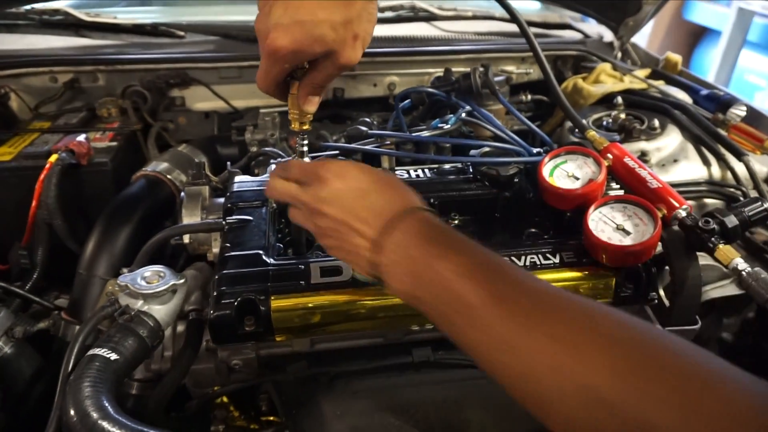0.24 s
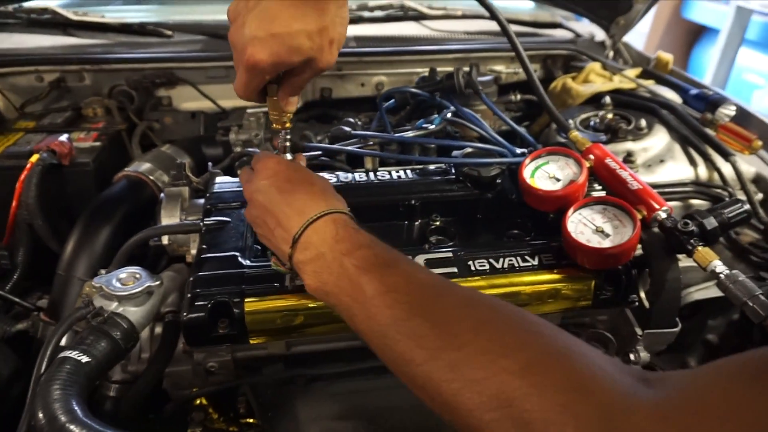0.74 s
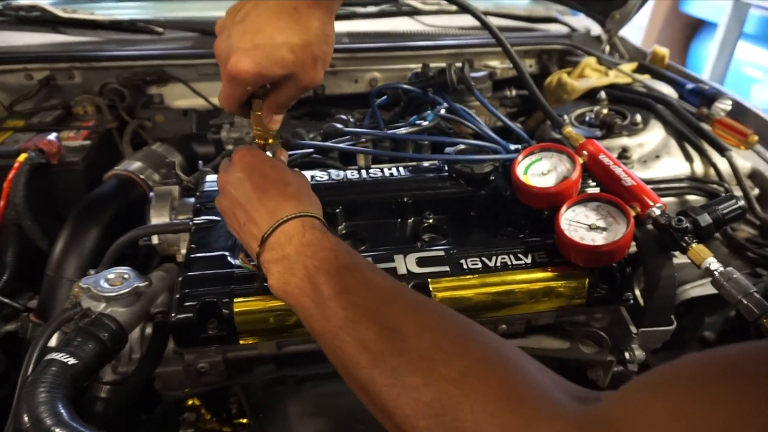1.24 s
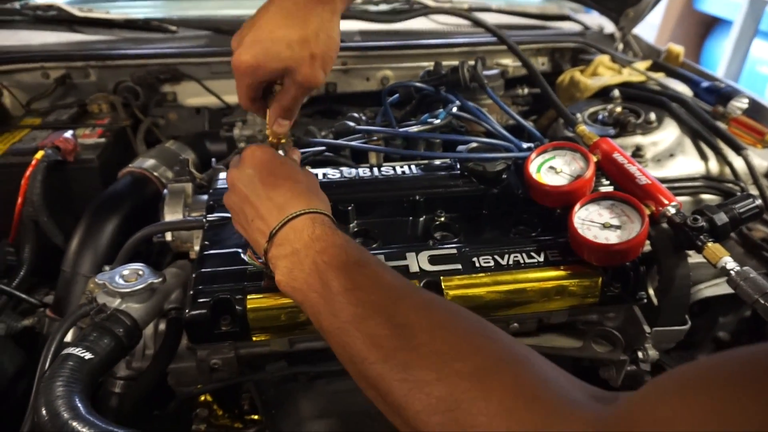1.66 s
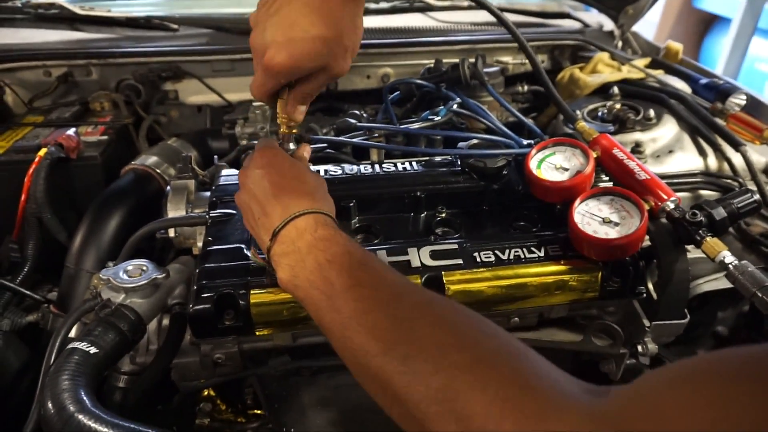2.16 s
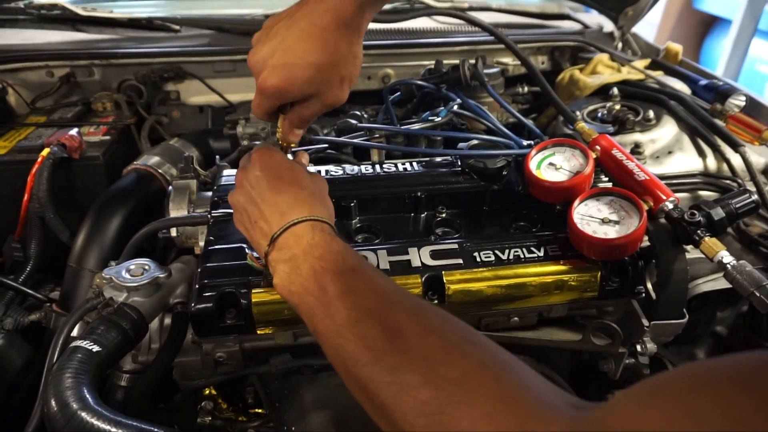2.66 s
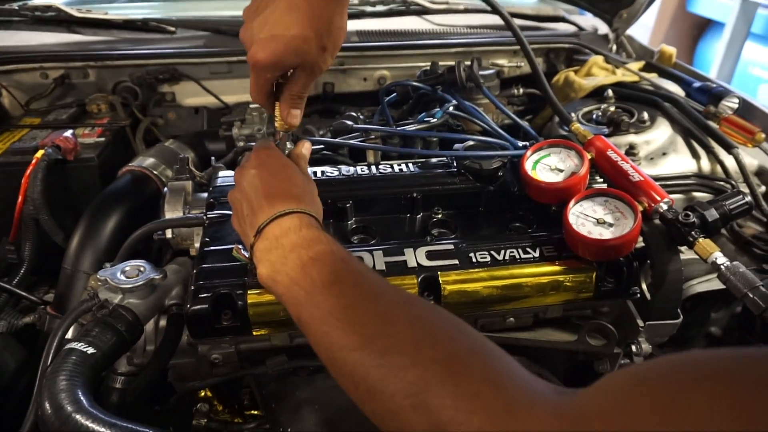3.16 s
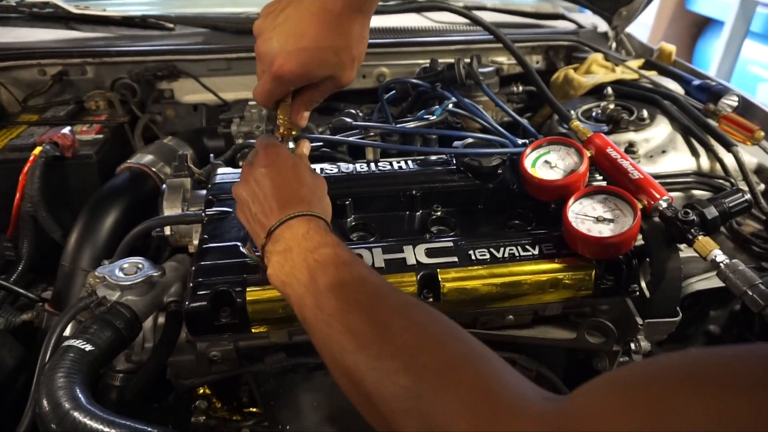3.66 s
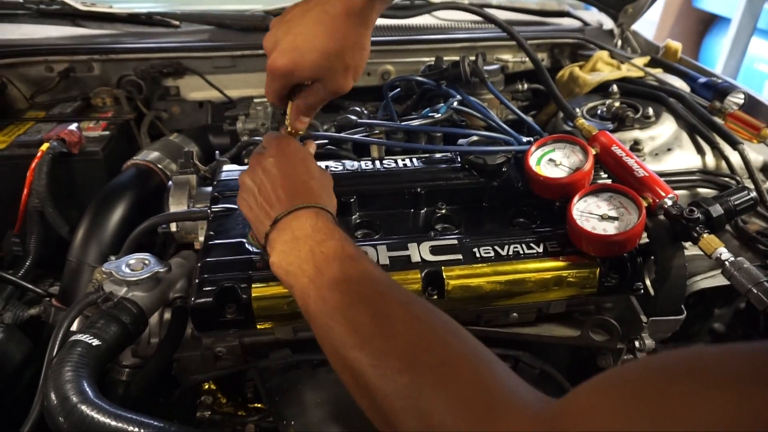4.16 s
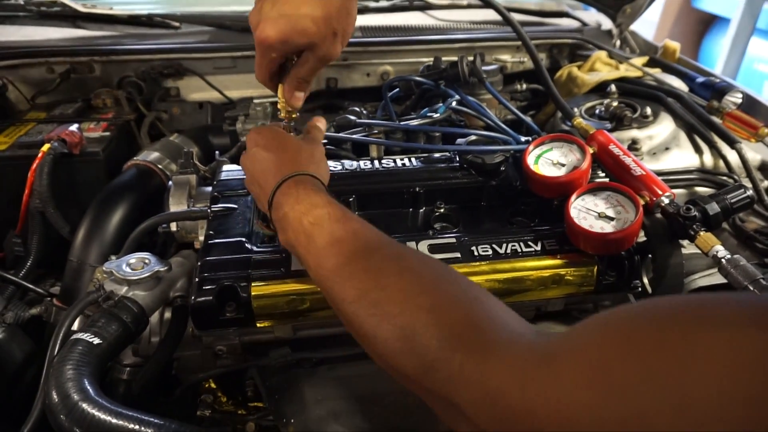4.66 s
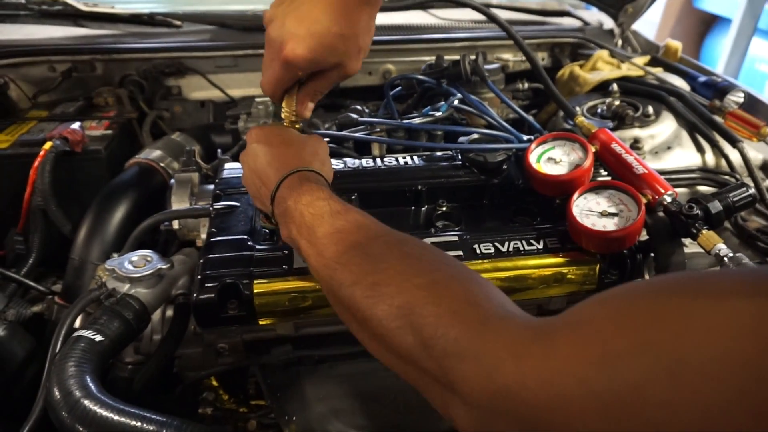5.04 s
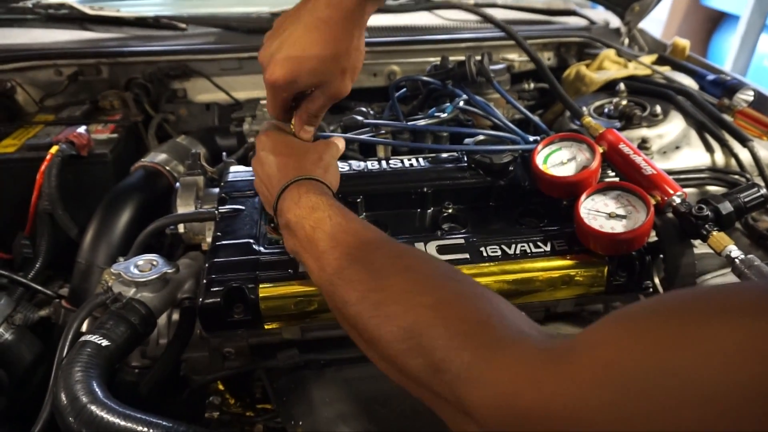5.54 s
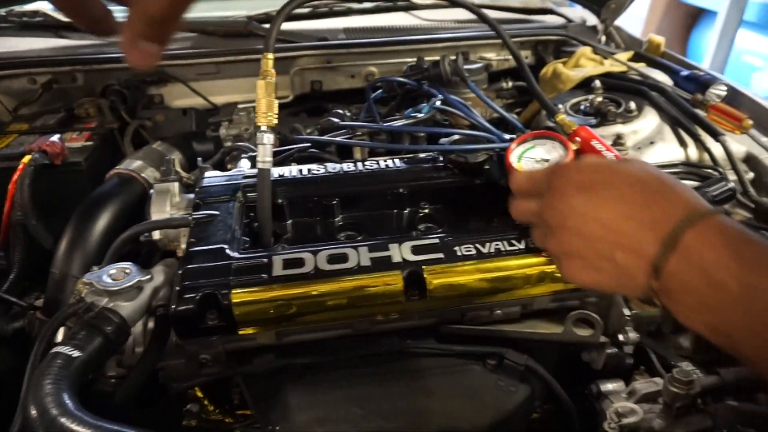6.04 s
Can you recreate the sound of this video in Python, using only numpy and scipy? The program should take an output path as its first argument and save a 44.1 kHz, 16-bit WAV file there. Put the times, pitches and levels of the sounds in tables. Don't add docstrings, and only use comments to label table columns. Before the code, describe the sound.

Close stereo pickup of an air coupler being pushed onto a fitting: small hard ticks and scrapes, dull seal puffs, and four fierce hisses of escaping air, three around seven tenths of a second and one just a quick spurt. Engine parts and the hall add a short reverberant tail. A distant compressor hums steadily behind, louder before the first blast, then pushed down and swelling unevenly by automatic gain.

```python
import sys
import numpy as np
from scipy import signal
from scipy.io import wavfile
from scipy.ndimage import uniform_filter1d, map_coordinates

SR = 44100
rng = np.random.default_rng(int(sys.argv[2]) if len(sys.argv) > 2 else 0)


def rack_gain(trim_db):
    fader = np.asarray(trim_db, float)
    return 10 ** (fader / 20)


def transcribe(u):
    v = np.clip(np.atleast_2d(u).T, -1, 1)
    q = np.round(v * 32767).astype(np.int16)
    wavfile.write(sys.argv[1], SR, q)


N = 277697
TIME = np.arange(N) / SR

# t/s, level over the mean flow/dB
PUSH = [(1.17, -1), (1.22, 0.8), (1.37, -0.8), (1.7, 0.2), (1.79, 0.4), (2.32, -1), (2.44, 0.2), (2.67, -2),
        (2.98, -0.6), (3.6, 0), (3.68, .5), (3.85, 0.2), (4.0, 2.5), (4.12, -0.5), (4.2, -2), (4.31, -1.5),
        (5.09, -1.3), (5.2, 2.5)]
# t/s, narrowness/dB, widening/s
SEATS = [
    (1.325, 5.5, 0.12),
    (2.295, 10, .11),
    (3.585, 7.5, 0.21),
    (5.07, 10.5, 0.063),
]


def jet():
    # full flow/s, shut/s, flow/dB, rise/dB per ms
    bursts = [
        (1.147, 1.794, -15.5, 2),
        (2.305, 3.007, -15.5, 4),
        (3.594, 4.317, -16.5, 2.5),
        (5.08, 5.213, -16.5, 1.6),
    ]
    # f/Hz, likeness
    jet_same = [(60, 0.98), (120, 0.99), (240, 1.0), (480, 0.38), (950, 1), (1890, 1), (3770, 0.39),
                (7520, 0.53), (15000, 0.22)]
    # f/Hz, left over right/dB
    jet_lean = [(60, 0.0), (130, 0.0), (290, -10), (640, 14), (1410, 0), (3100, -0.5), (6820, 2.5),
                (15000, -3.5)]
    shut_db_per_ms, surge_db, surge_s = 1.8, 1.5, 0.0091
    hiss = noise_pair(jet_colour, jet_same, jet_lean, patchy_db=1.1, steady=.75, size=1024)
    flow = 0
    for full, shut, db, rise in bursts:
        rise_db = np.minimum(rise * (TIME - full) * 1000, 0)
        shut_db = -shut_db_per_ms * np.maximum((TIME - shut) * 1000, 0)
        surge = surge_db * np.exp(-abs(TIME - full) / surge_s)
        flow = flow + rack_gain(db + rise_db + shut_db + surge)
    flutter_db = 0.15 * drift(25.02) + .5 * drift(120.0)
    narrow_db = 0.16 * jolts(SEATS, 0.012)
    return rack_gain(3.5 + flutter_db - narrow_db) * amp_of(PUSH, column=1) * flow * hiss


def jet_colour(hz, t):
    # f/Hz, level/dB per Hz
    jet_db = [(410, -58), (700, -37), (862, -40), (1360, -27.5), (1570, -21.5), (1880, -24.5), (1980, -21),
              (2930, -13), (3210, -14.5), (3850, -8.5), (6400, -9.5), (11600, -2), (14500, 1), (15700, -6)]
    # from/s, to/s, f/Hz, width/Hz, depth/dB (negative lifts)
    nulls = [
        (3.83, 4.07, 3430, 100, 30),
        (3.82, 3.9, 5050, 90, 20),
        (3.84, 3.89, 4600, 90, 20),
        (4.16, 4.22, 4100, 90, 18),
        (5.073, 5.102, 4750, 500, -10),
    ]
    # f/Hz, width/Hz, depth/dB (negative lifts)
    tube_nulls = [(1050, 250, 9), (1700, 200, 8), (3550, 160, 34), (3850, 120, -3), (4060, 90, 16),
                  (4510, 70, 14), (4950, 130, 26), (5370, 180, -4), (5680, 70, 14), (6750, 300, 22),
                  (7130, 70, 12), (7650, 70, 14), (8200, 150, -6)]
    tube_on, tube_off = 1.14, 1.33
    body_db, body_per_push = -2, 0.3
    roar_db, roar_per_push, roar_per_narrow, tube_roar_db = -2, -0.68, .8, 5

    narrow, push = jolts(SEATS, 0.014, t), np.interp(t, *np.transpose(PUSH))
    tube = np.interp(t, [tube_on - .03, tube_on, tube_off, tube_off + 0.065], [0, 1, 1, 0])
    body_band = np.exp(-np.log((hz + 1) / 5200) ** 4 / 0.018)
    body = body_band * (body_db + body_per_push * push - narrow)
    roar_band = np.exp(-np.log((hz + 1) / 2200) ** 4 / 0.27)
    roar = roar_band * (roar_db + roar_per_push * push - roar_per_narrow * narrow + tube_roar_db * tube)
    notches = 0
    for start, end, f, width, db in [*nulls] + [(tube_on, tube_off, *row) for row in tube_nulls]:
        active = np.interp(t, [start - .02, start, end, end + .02], [0, 1, 1, 0])
        notches = notches + db * np.exp(-((hz - f) / width) ** 2) * active
    comb = rng.standard_normal((len(t), len(hz))).T
    comb = uniform_filter1d(comb, size=3, axis=0)
    comb = evened(uniform_filter1d(comb, size=36, axis=1))
    return read(jet_db, hz) + body + roar - notches - 1.5 * np.maximum(comb, 0) ** 2


def leak():
    # t/s, f/Hz, level/dB
    whistle = [
        (5.22, 11830, -45),
        (5.35, 11900, -50),
        (5.55, 12050, -59),
        (5.8, 12150, -68),
        (6.3, 12250, -75),
    ]
    s, hz, _ = np.transpose(whistle)
    hz, grit = np.interp(TIME, s, hz), rng.standard_normal((2, N))
    tones = evened(resonate(grit, hz, 160)) + rack_gain(-2) * evened(resonate(grit, 1.095 * hz, 350))
    return amp_of(whistle, column=2) * (TIME > s[0]) * tones


def rattle():
    # t/s, peak/dB, bright spot/Hz, sleeve ring/dB
    short_ticks = [(0.238, -34, 12500, 1), (0.854, -24, 11600, -21), (0.9214, -32, 13200, -1),
                   (1.0744, -25, 7760, -35), (2.086, -36, 10100, -8), (2.164, -46, 12200, -19),
                   (2.1939, -39, 7330, -10), (3.148, -35, 9530, -21), (3.1662, -33, 9900, -18),
                   (3.2572, -28, 15000, -23), (3.2842, -21, 9900, -23), (3.2895, -29, 6260, -21),
                   (3.3179, -33, 10400, -16), (3.3633, -37, 11100, -22), (4.3587, -26, 12000, -20),
                   (4.6594, -43, 8680, -9), (4.6892, -40, 9020, -13), (4.7274, -43, 12300, -4),
                   (6.004, -52, 13300, -6)]
    # t/s, peak/dB, bright spot/Hz, sleeve ring/dB, length/s
    scrapes = [(0.542, -27, 7730, -15, 0.02), (0.5656, -27, 13100, -8, 0.013), (0.584, -22, 7000, 0, 0.02),
               (0.819, -9, 13400, -5, 0.0074), (0.952, -21, 6710, -3.5, 0.018),
               (1.045, -17, 14900, -23, 0.0099), (1.056, -8.5, 7500, -11, 0.018),
               (1.059, -12.5, 7750, 1, 0.014), (1.351, -13, 8000, -8, 0.01), (2.009, -34, 7250, -13, 0.012),
               (2.102, -28, 13900, -27, 0.018), (2.112, -23.5, 13800, -21, 0.0091),
               (2.1345, -32, 8390, -20, 0.013), (2.2115, -30, 7350, -3.5, 0.014),
               (2.221, -33, 11100, -20, 0.013), (3.226, -32, 13900, -19, 0.016),
               (3.256, -24, 13400, -23, 0.021), (4.874, -34, 7900, -15, 0.01),
               (4.906, -35, 13900, -11, 0.0075), (5.4523, -24.5, 11900, -16, 0.0089)]
    tick_s, crack, crack_s = .0045, 1.2, .0012
    out, t = np.zeros((2, N)), np.arange(2400) / SR
    for s, db, hz, ring_db, length in [(*row, tick_s) for row in short_ticks] + [*scrapes]:
        lean_db = np.clip(-1.5 + 5 * rng.standard_normal(), -7, 7)
        size, grit = rng.exponential(1, 60), rng.standard_normal((3, len(t)))
        ticks = np.repeat(size, 40) ** 0.45 * np.minimum(t / 0.0004, 1) * rack_gain(-15 * (t / length) ** 2.2)
        grit = (grit[0] + 0.79 * grit[1:]) * ticks * (1 + crack * np.exp(-t / crack_s))
        wide = np.diff(grit, prepend=0)
        bright = evened(resonate(wide, hz, 1500))
        bright += rack_gain(-2) * evened(wide)
        bright += rack_gain(-5) * evened(resonate(grit, 7300, 900))
        ring = evened(resonate(resonate(grit, 4200, 1300), 4200, 1500))
        ring += rack_gain(-4) * evened(resonate(grit, 2600, 2000))
        ring += rack_gain(-7) * evened(resonate(grit, 3950, 250))
        sound = bright / abs(bright).max() + rack_gain(ring_db) * ring / abs(ring).max()
        add(out, s - .0005, rack_gain(db + 5.0 + np.array([[.5], [-.5]]) * lean_db) * sound)
    return out


def puffs():
    # t/s, peak/dB, centre/Hz, width/Hz, length/s
    seal_puffs = [(0.822, -26, 800, 500, 0.0094), (0.895, -23.5, 1160, 900, .025),
                  (1.066, -21, 1300, 900, 0.0054), (1.351, -22, 1840, 2500, 0.0058),
                  (1.774, -21.5, 2440, 2500, 0.0087), (2.984, -16, 2900, 2500, 0.012),
                  (3.263, -35, 2800, 1500, 0.0066), (3.273, -30, 338, 120, 0.019),
                  (4.299, -26, 2300, 2500, 0.0083), (2.288, -31, 14200, 2500, .004),
                  (3.573, -31, 14500, 2500, .004), (5.049, -38, 12100, 4000, 0.0091),
                  (1.353, -30, 770, 300, 0.0084)]
    out, t = np.zeros((2, N)), np.arange(2400) / SR
    for s, db, hz, width, length in seal_puffs:
        grit = rng.standard_normal((3, len(t)))
        grit = grit[0] + 0.15 * grit[1:]
        shape = t / length * np.exp(1 - t / length) * np.exp(-(t / length / 2) ** 2)
        puff = evened(resonate(resonate(grit, hz, width), hz, width))
        add(out, s, rack_gain(db - 6.0) * puff * shape)
    return out


def bay(x):
    # f/Hz, t60/s
    bay_t60 = [(1000, 0.6), (4000, 0.95), (9000, 0.62), (15000, 0.32)]
    taps = np.zeros((2, SR))
    at = np.arange(200, SR - 20, 20) + rng.integers(0, 20, (2, (SR - 201) // 20))
    np.put_along_axis(taps, at, rng.choice([-1., 1.], at.shape), 1)
    hz, t, z = signal.stft(taps, SR, nperseg=256)
    slope = rack_gain(-60 * t / read(bay_t60, hz)[:, None])
    slope = slope + rack_gain(17 - 60 * t / 0.036)
    slope = slope + rack_gain(-27 - 60 * t / 1.1)
    tail = signal.istft(z * slope, SR, nperseg=256)[1]
    return signal.fftconvolve(x, tail / np.linalg.norm(tail[0]), axes=1)[:, :N]


def workshop():
    # multiple of shaft speed, level/dB
    hum_orders = [(1, -47), (2, -19), (3, -18.5), (4, 0), (5, -13.5), (6, -22), (7, -19.5), (8, -8.5),
                  (9, -20), (10, -7.5), (11, -19), (12, -14.5), (13, -27), (17, -21)]
    # f/Hz, width/Hz, level/dB
    whines = [(2800, 180, -17), (2010, 100, -21), (3900, 25, -24)]
    # f/Hz, level/dB per Hz
    shop_db = [(24, -75), (40, -100), (103, -12.5), (170, -13), (224, -13.5), (310, -12.5), (452, -8.5),
               (512, -12), (566, -4.5), (1060, -15.5), (2800, -15), (3970, -24.5), (5640, -33),
               (12200, -26), (15700, -30)]
    # f/Hz, likeness
    shop_same = [(60, 0.97), (150, 1.0), (380, 0.94), (950, 0.79), (2380, 0.22), (5980, 0.38),
                 (15000, -1.6)]
    # f/Hz, left over right/dB
    shop_lean = [(60, 4), (120, -1.5), (240, -0.5), (480, -3.5), (950, -4.5), (1890, -5.5), (3770, -7),
                 (7520, -0.5), (15000, -5.5)]
    shaft_hz, gear_hz, gear_db = 56.84, 3981, -22.5
    turns = np.cumsum(shaft_hz * (1 + 0.0011 * drift(3.0))) / SR
    hum = np.zeros((2, N))
    for k, db in hum_orders:
        lean_db = np.array([[.5], [-.5]]) * read(shop_lean, k * shaft_hz)
        waver_db = (.6 - 0.14 * db) * drift(12.0)
        hum += rack_gain(1.12 * db + 3 + lean_db + waver_db) * np.sin(2 * np.pi * (k * turns + rng.random()))
    for hz, width, db in whines:
        hum += rack_gain(db) * evened(resonate(rng.standard_normal((2, N)), hz, width))
    hum += rack_gain(gear_db + 2.5 * drift(6.0)) * np.sin(2 * np.pi * gear_hz * TIME)

    def room_colour(hz, t):
        return read(shop_db, hz) + 0 * t

    wash = noise_pair(room_colour, shop_same, shop_lean, patchy_db=1.1, steady=.15, size=2048)
    throb = 1 + 0.1 * np.cos(2 * np.pi * turns) + 0.036 * np.cos(4 * np.pi * turns + 6.2)
    return camera_gain() * (hum + rack_gain(-0.5) * throb * wash)


def camera_gain():
    # t/s, level/dB
    gain_drift = [(0.0, -38), (0.3, -40.5), (0.54, -40.5), (0.8, -39), (1.1, -34.5), (1.2, -41),
                  (1.75, -36), (2.26, -40.5), (2.6, -37), (3.4, -37.5), (3.56, -40.5), (3.85, -37.5),
                  (4.47, -38), (4.72, -42.5), (5.0, -42), (5.3, -37), (5.61, -43), (6.3, -39)]
    # t/s, depth/dB, recovery/s
    dips = [
        (1.15, 7, 0.019),
        (1.32, 7.5, 0.1),
        (1.8, 6, .04),
        (2.31, 13, 0.084),
        (3.595, 10, 0.095),
        (5.082, 13, 0.061),
    ]
    range_s, range_fall_s, range_db = 1.138, .004, 10
    step_db = range_db * np.clip(1 - (TIME - range_s) / range_fall_s, 0, 1)
    return amp_of(gain_drift, column=1) * rack_gain(step_db - jolts(dips, fall=.015))


def noise_pair(colour_db, same, lean, patchy_db, steady, size=1024):
    hop = size // 4
    frames, hz = N // hop + 5, np.fft.rfftfreq(size, 1 / SR)[:, None]
    a, b, c, d, patches, paths = rng.standard_normal((frames, len(hz), 6)).T
    patches = uniform_filter1d(patches, size=size // 64, axis=0)
    patches = evened(uniform_filter1d(patches, size=12, axis=1))
    paths = uniform_filter1d(paths, size=size // 100, axis=0)
    paths = evened(uniform_filter1d(paths, size=90, axis=1))
    alike = np.clip(read(same, hz), -.5, .985)
    related = np.maximum(abs(alike), np.clip(steady, .01, 1))
    turn = np.exp(1j * np.arccos(alike / related) * paths)
    left = a + 1j * b
    right = related * turn * left + np.sqrt(1 - related ** 2) * (c + 1j * d)
    z = np.array([left, right])
    z *= rack_gain(colour_db(hz, np.arange(frames) * hop / SR) + patchy_db * patches)
    z *= rack_gain(np.array([.5, -.5])[:, None, None] * read(lean, hz))
    return evened(signal.istft(z, nperseg=size, noverlap=size - hop)[1][:, :N])


def resonate(x, hz, width):
    turn = np.exp(2j * np.pi * np.cumsum(hz * np.ones(x.shape[-1])) / SR)
    r = np.exp(-np.pi * width / SR)
    return 2 * (turn * signal.lfilter([1 - r], [1, -r], x / turn)).real


def drift(per_s, size=N):
    knots = rng.standard_normal(int(per_s * size / SR) + 4)
    return evened(map_coordinates(knots, [np.arange(size) * per_s / SR]))


def jolts(rows, fall, t=TIME):
    total = 0
    for s, db, back in rows:
        onset = np.clip((t - s) / fall + 1, 0, 1)
        total = total + db * onset * np.exp(-np.maximum(t - s, 0) / back)
    return total


def amp_of(rows, column, t=TIME):
    rows = np.transpose(rows)
    return rack_gain(np.interp(t, rows[0], rows[column]))


def evened(x):
    return x / np.sqrt(np.mean(x ** 2) + 1e-20)


def read(points, hz):
    f, value = np.transpose(points)
    return np.interp(np.log(hz + 1), np.log(f + 1), value)


def add(mix, s, sound):
    part = mix[:, round(s * SR):][:, :sound.shape[1]]
    part += sound[:, :part.shape[1]]


def scene():
    air, brass = jet(), rattle() + puffs()
    return air + brass + bay(rack_gain(-17.5) * air + rack_gain(-12.0) * brass) + leak() + workshop()


def low_pass(x):
    return signal.sosfilt(signal.butter(12, 16820, fs=SR, output="sos"), x)


def record(dry):
    limited = 1.1 * np.tanh(dry / 1.1)
    cut = signal.sosfilt(signal.butter(4, 75, "high", fs=SR, output="sos"), limited)
    rumble = rack_gain(-41) * camera_gain() * evened(resonate(rng.standard_normal(dry.shape), 40, 60))
    edge = signal.firwin(1023, 15750, window=("kaiser", 9), fs=SR)
    mix = signal.oaconvolve(cut + rumble, edge[None], "same")
    return low_pass(mix)


dry = scene()
out = record(dry)
transcribe(out)
```